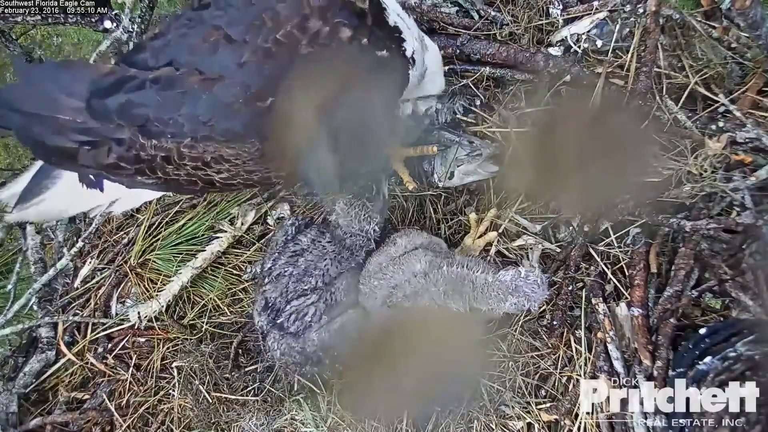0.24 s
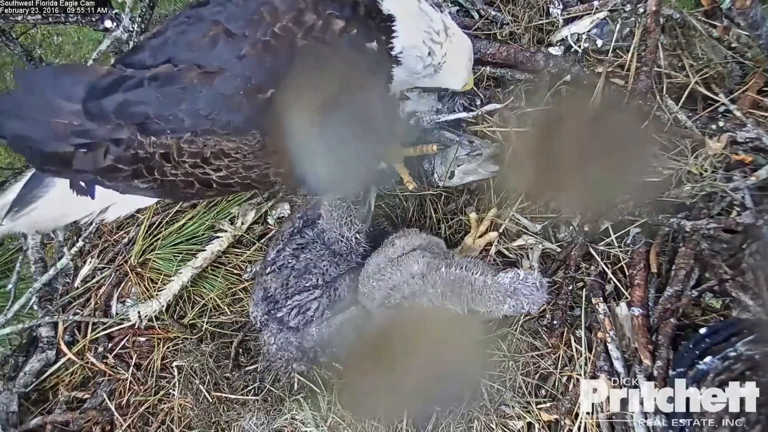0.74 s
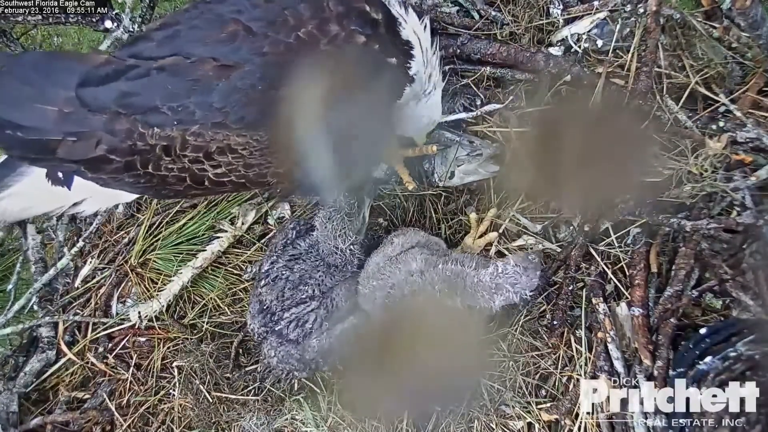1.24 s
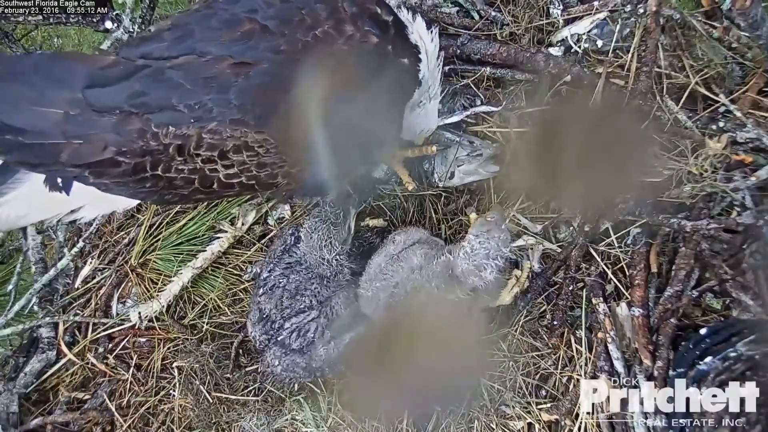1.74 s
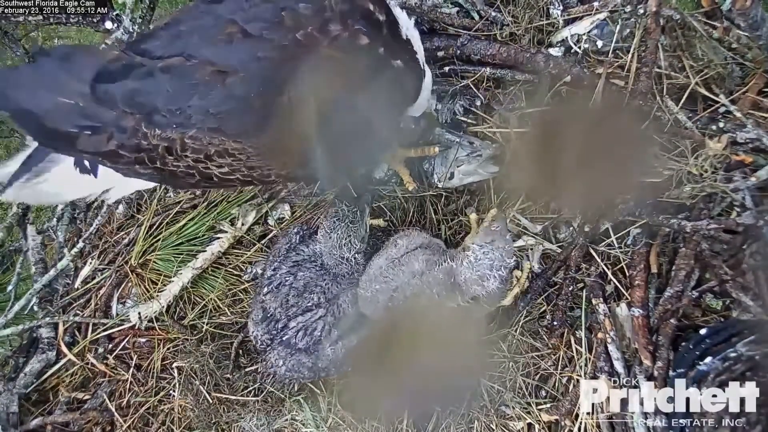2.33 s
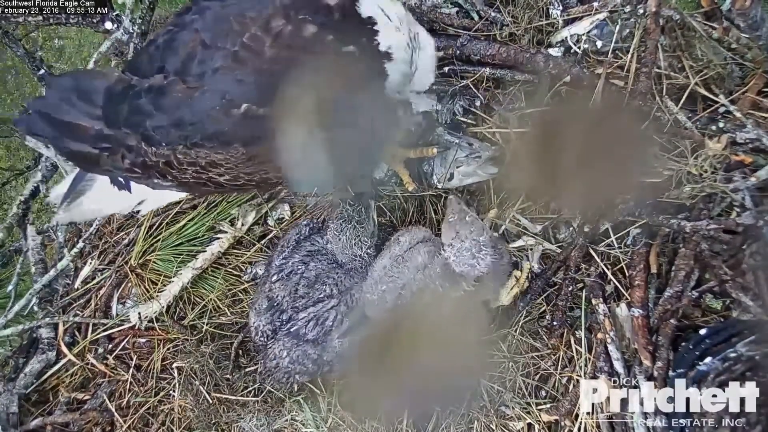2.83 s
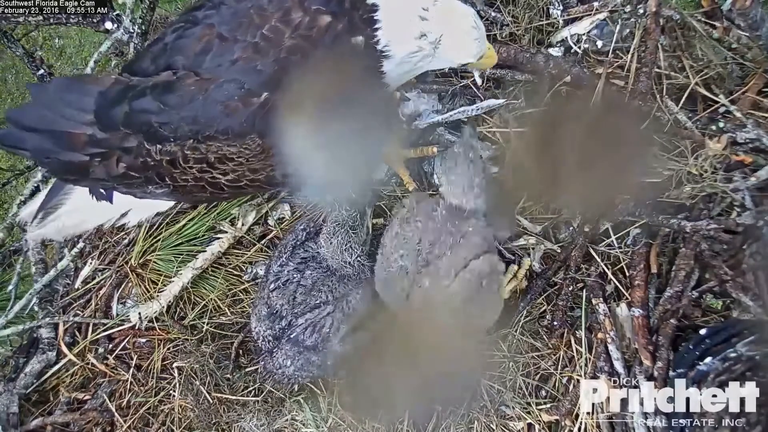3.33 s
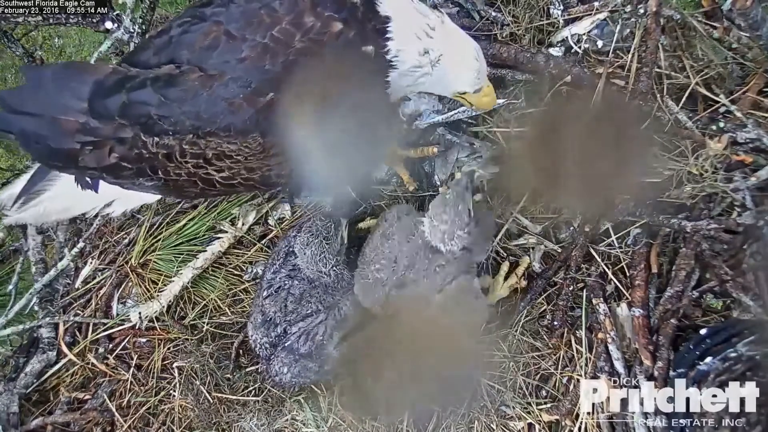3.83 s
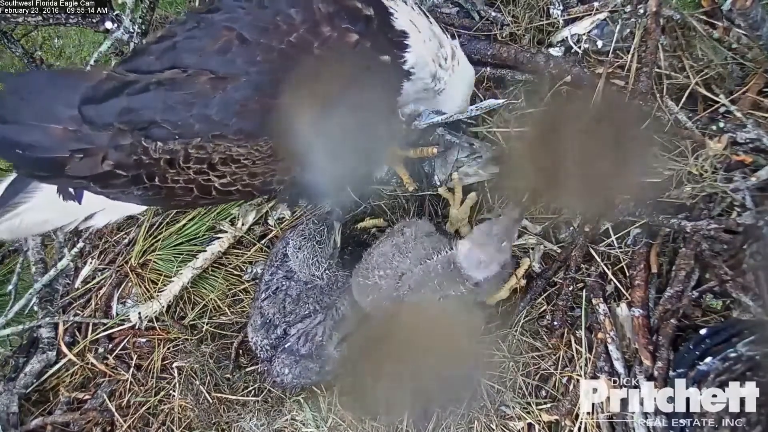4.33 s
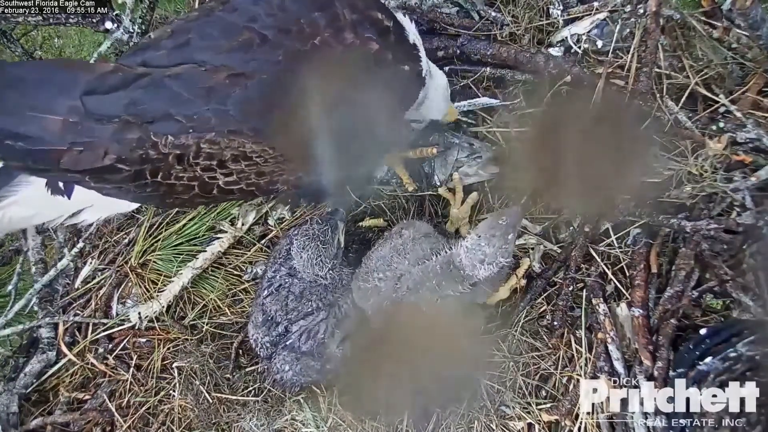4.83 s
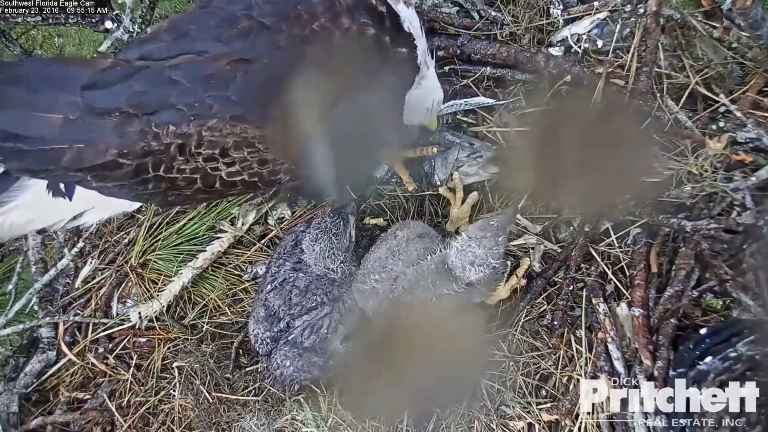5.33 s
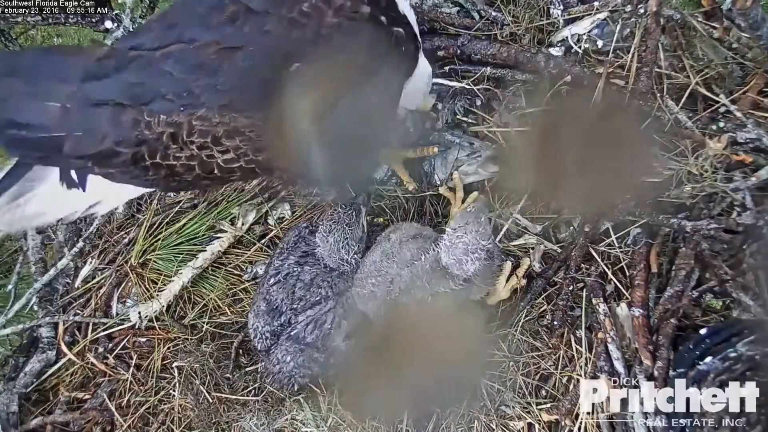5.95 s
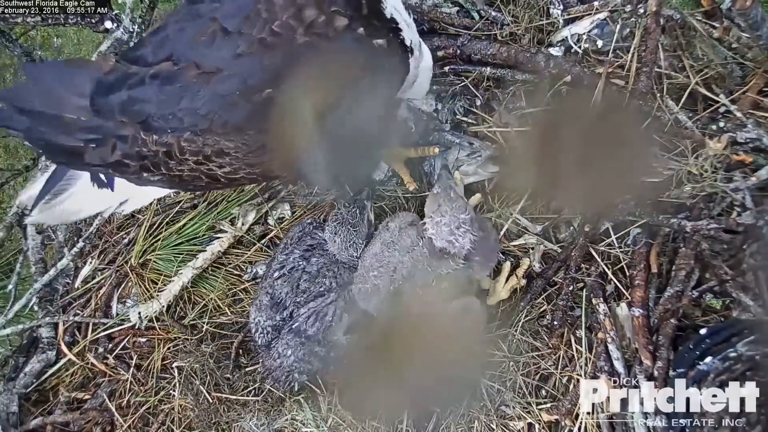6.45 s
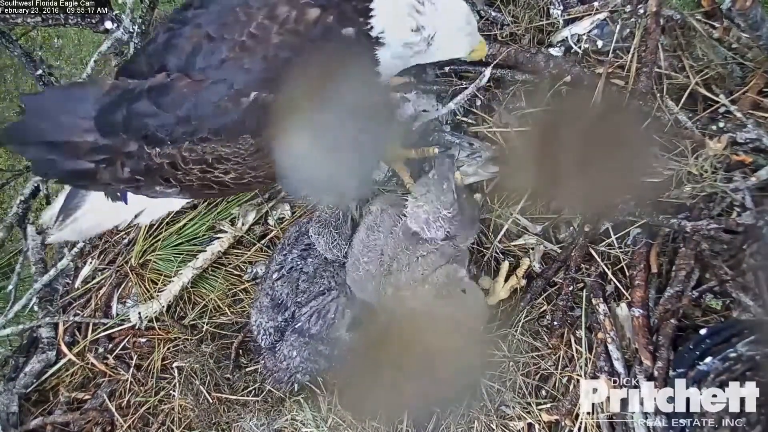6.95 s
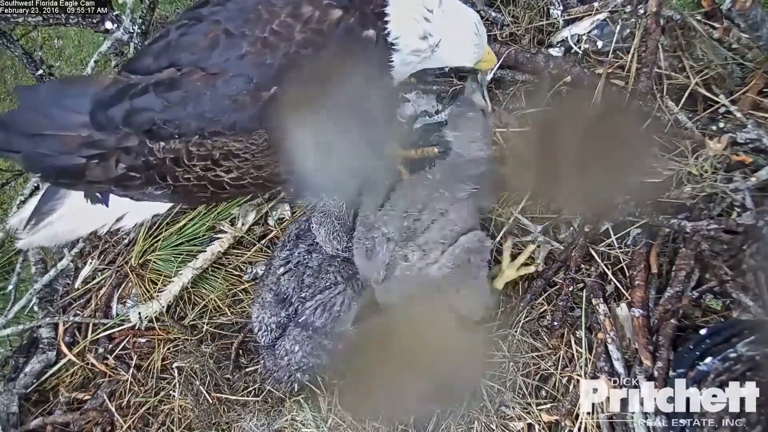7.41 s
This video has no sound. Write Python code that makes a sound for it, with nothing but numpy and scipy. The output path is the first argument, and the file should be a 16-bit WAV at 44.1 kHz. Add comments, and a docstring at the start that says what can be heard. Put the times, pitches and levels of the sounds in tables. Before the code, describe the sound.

Outdoors at a stick nest, eagle chicks beg beside a feeding adult, heard close by a wind-exposed microphone. Light rain makes a soft, patchy mid-high wash with fine drops; a faint wavering low drone and weak moans lie far behind. Wind rumbles throughout in lumpy gusts, with hard thumps near 2.8, 3.0, 4.0, 4.7 and 6.1 seconds. Tiny chirps and slurred pips open the scene. From 0.9 to 1.7 a thin, trembling whine climbs, then drops sharply. An airy arched peep follows at 2.0, another whine from 2.6 to 3.4, and a second peep at 3.7. Soft whimpering starts at 4.0, with quick pips to 5.0, then a wavering wail from 5.1 ending in a sudden fall at 5.75. A loud, raspy, breathy two-part cry bursts out at 6.05-6.5. Another wail runs from 6.75 to 7.4, with last twitters near 7.6.

```python
"""Eagle chicks begging at an open nest

Thin rising whines, arched peeps, quick pips and one loud cry; some are heard again as the sound repeats 1.682 s later.
Each voice is a trembling sine with a weaker octave and a fringe of narrow noise; open-beaked calls add airy noise.
Wind gusts are shaped low noise and single pressure pulses; light rain is patchy noise with a patter of drops.
A faint far drone, weaker moans and thin high sizzles are narrow bands of noise."""
import sys
import numpy as np
from scipy import signal
from scipy.fft import rfft, irfft, next_fast_len
from scipy.io import wavfile
from scipy.ndimage import uniform_filter1d, map_coordinates

SR = 44100
rng = np.random.default_rng(int(sys.argv[2]) if len(sys.argv) > 2 else 0)


def wav_record(signal):
    """Record a signal, one row per channel, as 16-bit PCM in the file named by sys.argv[1]."""
    frames = np.transpose(np.atleast_2d(signal))
    bounded = np.clip(frames, -1, 1)
    # unit amplitude maps onto the largest positive 16-bit level
    quanta = np.round(bounded * 32767).astype(np.int16)
    wavfile.write(sys.argv[1], SR, quanta)


N = 338688
TIME = np.arange(N) / SR
AGAIN_S = 1.682  # time until a sound is heard again

# the open-beaked peep, as a curve before its gain: t/s, f/Hz, level/dB
PEEP = [(2.017, 2990, -31.5), (2.03, 3145, -29.5), (2.058, 3266, -27), (2.082, 3570, -32.5),
        (2.113, 3216, -27), (2.135, 3260, -25.5), (2.19, 3196, -41)]
# the loud cry, as a curve before its gain: t/s, f/Hz, level/dB
CRY = [(6.055, 2740, -34.5), (6.093, 3360, -20.5), (6.097, 2960, -21.5), (6.145, 3014, -24),
       (6.178, 2910, -23.5), (6.215, 2900, -23.5), (6.243, 2770, -26), (6.253, 2800, -24),
       (6.257, 2985, -23.5), (6.295, 3120, -23), (6.32, 3460, -31), (6.375, 3595, -23),
       (6.405, 3442, -20.5), (6.455, 3416, -25.5), (6.472, 3290, -27.5), (6.48, 2740, -33),
       (6.497, 2380, -32), (6.508, 2320, -32)]
# wind gusts, before the overall trims: t of the peak/s, length/s, rumble level/dB, flutter level/dB
GUSTS = [(0.568, 0.12, -22, -22.5), (0.756, .16, -21.5, -27), (0.93, 0.16, -24.5, -26.5),
         (1.63, 0.21, -26, -25.5), (2.05, 0.15, -21.5, -34), (2.358, 0.24, -22, -31),
         (2.766, 0.29, -22.5, -30), (3.055, 0.16, -18, -29.5), (3.293, 0.13, -28.5, -27),
         (3.555, 0.27, -17, -25), (4.024, 0.29, -20.5, -25.5), (4.41, 0.24, -21, -48),
         (5.049, 0.095, -18, -40), (5.329, 0.078, -19.5, -31.5), (5.528, 0.16, -19.5, -24),
         (5.747, 0.091, -20.5, -26.5), (6.047, 0.13, -21, -34.5), (6.519, 0.33, -20.5, -27),
         (6.955, 0.23, -24, -28.5), (7.295, 0.099, -26.5, -32), (7.58, 0.16, -24, -27.5)]


def amp(db):
    """Turns decibels into a gain."""
    return 10 ** (np.asarray(db) / 20)


def evened(x):
    """Scales a sound to an average (rms) strength of 1."""
    return x / np.sqrt(np.mean(x ** 2) + 1e-20)


def read(points, hz):
    """Looks up a table's value at hz, on a log-frequency axis."""
    f, value = np.transpose(points)
    return np.interp(np.log(hz + 1), np.log(f + 1), value)


def add(mix, s, sound):
    """Mixes a sound in at s seconds."""
    part = mix[max(round(s * SR), 0):][:len(sound)]
    part += sound[:len(part)]


def coloured(x, points):
    """Filters a sound by a table of f/Hz, level/dB."""
    gain = amp(read(points, np.fft.rfftfreq(N, 1 / SR)))
    return irfft(rfft(x) * gain, N)


def wander(n, hz):
    """Smooth random motion of rms 1 that moves up to about hz times a second."""
    size = next_fast_len(n + SR // 4)
    f = np.fft.rfftfreq(size, 1 / SR)
    spectrum = rfft(rng.standard_normal(size)) * np.exp(-(f / hz) ** 2)
    return evened(irfft(spectrum, size))[:n]


def fuzzy(hz, width_hz):
    """A narrow band of noise of rms 1 round a moving pitch."""
    phase = 2 * np.pi * np.cumsum(hz) / SR
    return wander(len(hz), width_hz) * np.cos(phase) + wander(len(hz), width_hz) * np.sin(phase)


def swells(rows, width_hz):
    """Narrow bands of noise that each fade in and out."""
    out = np.zeros(N)
    for s, length, hz, db in rows:
        swell = np.cos(np.pi / 2 * np.clip((TIME - s) / length, -1, 1)) ** 2
        heard = abs(TIME - s) < length
        out[heard] += amp(db) * swell[heard] * fuzzy(np.full(heard.sum(), hz), width_hz)
    return out


def drone(width_hz=13.6, waver=0.0253, waver_hz=4):
    """A far, fuzzy tone: a narrow noise band that drifts and wavers in pitch."""
    # slow drift of the drone: t/s, f/Hz, level/dB
    drift = [(0, 381, -39), (.55, 355.5, -46), (1.2, 364, -38), (1.8, 401.6, -44.5), (3.1, 400, -46),
             (3.85, 410, -40.5), (4.4, 397, -44), (4.8, 374, -53), (6.3, 370.3, -49.5),
             (6.95, 393.5, -43.5), (7.35, 380.4, -56), (7.68, 370, -46)]
    s, hz, db = np.transpose(drift)
    pitch = np.interp(TIME, s, hz) * (1 + waver * wander(N, waver_hz))
    return amp(np.interp(TIME, s, db)) * fuzzy(pitch, width_hz)


def moans(width_hz=15.4):
    """Weaker moans near the drone: narrow noise bands that swell now and then."""
    # swells of moaning: t of the middle/s, fade time each way/s, centre f/Hz, level/dB
    moan_rows = [(.35, 0.94, 487, -45.5), (1.1, 0.45, 493, -47.5), (1.56, 0.24, 537, -43.5),
                 (2.05, 0.49, 535.5, -47.5), (2.75, 0.5, 361.5, -40), (3.27, 0.25, 542, -49),
                 (3.98, 0.29, 467.4, -43), (5.6, 0.3, 496, -44)]
    return swells(moan_rows, width_hz)


def rain(rain_db=-31, patch_db=1.0, drops_per_s=350, drops_db=-13):
    """Rain in the foliage: a slightly patchy wash of far drops, with a patter of nearer ones."""
    # tone of rain in the leaves: f/Hz, relative level/dB
    leaf_tone = [(300, -4), (600, -6.5), (900, -9.5), (1100, -8.5), (1450, -3), (1850, -7.5), (2150, -4),
                 (2500, -3.5), (2800, 0), (3600, -8.5), (4600, -18), (5600, -29), (6800, -40),
                 (7200, -61.5), (9000, -68)]
    z = signal.stft(rng.standard_normal(N), nperseg=512)[2]
    patches = uniform_filter1d(rng.standard_normal(z.shape), size=6, axis=0)  # smooth across pitch
    patches = evened(uniform_filter1d(patches, size=14, axis=1))  # then across time
    wash = evened(signal.istft(z * amp(patch_db * patches), nperseg=512)[1][:N])
    drops = evened(rng.standard_normal(N) * (rng.random(N) < drops_per_s / SR))
    return amp(rain_db) * evened(coloured(wash + amp(drops_db) * drops, leaf_tone))


def sizzle(width_hz=420, fizz_db=-70, flicker_db=3, flicker_hz=18):
    """Noise bands make soft swells of thin, high hiss, with a very faint flickering fizz."""
    # tone of the faint fizz: f/Hz, relative level/dB
    fizz_tone = [(4000, -25), (6000, 17), (6800, -5), (7400, -2), (9000, 0.5), (11000, 13), (12500, 3),
                 (14800, -1)]
    # swells of thin hiss: t of the middle/s, fade time each way/s, centre f/Hz, level/dB
    sizzle_rows = [(0.693, 0.093, 6200, -59), (1.693, 0.079, 6240, -57), (1.888, 0.13, 6460, -55),
                   (3.25, 0.18, 6380, -59.5), (3.40, 0.15, 6280, -57), (3.568, 0.096, 6300, -53.5),
                   (4.601, 0.098, 6600, -57), (4.928, 0.12, 6250, -56.5), (5.126, 0.084, 6160, -55),
                   (7.50, 0.031, 6200, -52)]
    flicker = amp(flicker_db * wander(N, flicker_hz))
    fizz = evened(coloured(rng.standard_normal(N), fizz_tone) * flicker)
    return amp(fizz_db) * fizz + swells(sizzle_rows, width_hz)


def gusting(breeze_db, peaks_db, rise=0.37):
    """Strength of the wind: each gust builds, dies away more slowly, and adds its power to the breeze."""
    power = amp(breeze_db) ** 2
    for (s, length, _, _), db in zip(GUSTS, peaks_db):
        width = length * np.where(TIME < s, rise, 1 - rise)  # rise is the share spent building up
        power = power + amp(db) ** 2 * np.exp(-((TIME - s) / width) ** 2)
    return np.sqrt(power)


def wind(breeze_db=-27, wind_db=0.5, lump_db=2.0, lump_hz=25):
    """Lumpy turbulence follows the gusts; single eddies push and pull on the diaphragm."""
    # tone of the rumble at the microphone: f/Hz, relative level/dB
    rumble_tone = [(8, -10.5), (18, 5.5), (28, 2.5), (50, -0.5), (80, -8.5), (120, -18.5), (170, -21.5),
                   (260, -24), (400, -39), (600, -48), (1200, -97.5)]
    # single eddies that thump the microphone: t/s, f/Hz, peak level/dB, push +1 or pull -1
    buffets = [(.778, 59.1, -13, -1), (2.849, 89.5, -11, 1), (3.040, 70.2, -5, 1), (3.982, 50.3, -14, -1),
               (4.007, 194, -10, -1), (4.014, 242, -14.5, 1), (4.025, 240, -16.5, 1), (4.691, 26.6, -9, -1),
               (5.520, 198.4, -21, 1), (6.101, 35, -10.5, -1)]
    lumps = amp(lump_db * wander(N, lump_hz))
    eddies = evened(coloured(rng.standard_normal(N), rumble_tone) * lumps)
    out = eddies * amp(wind_db) * gusting(breeze_db, [rumble_db for _, _, rumble_db, _ in GUSTS])
    for s, hz, db, way in buffets:
        u = (np.pi * hz * (TIME - s)) ** 2
        out += np.sign(way) * amp(db) * (1 - 2 * u) * np.exp(-u)  # a pulse with an opposite swing each side
    return out


def flutter(breeze_db=-31.5, flutter_db=-0.64):
    """Faster air sheds smaller eddies, which sound higher."""
    # tone of the small, fast eddies: f/Hz, relative level/dB
    flutter_tone = [(35, -8), (65, 4.5), (115, 2.5), (180, -5.5), (260, -7.5), (400, -16), (600, -26.5),
                    (1200, -87)]
    strength = gusting(breeze_db, [db for _, _, _, db in GUSTS])
    return amp(flutter_db) * strength * evened(coloured(rng.standard_normal(N), flutter_tone))


def air(air_db=-24, smooth_s=0.057):
    """Air rushes through the open beak in the peeps and the cry: high noise with softened swells."""
    # tone of the breathy rush: f/Hz, relative level/dB
    breath_tone = [(3500, -40), (4500, 4), (5400, 0.5), (6100, 4.5), (6550, 11), (6950, -8.5),
                   (7400, -32.5), (9000, -63)]
    effort = np.zeros(N)
    for rows, delay in ((PEEP, 0), (PEEP, AGAIN_S), (CRY, 0)):
        s, hz, db = np.transpose(rows)
        effort += np.interp(TIME, s + delay, amp(db), 0, 0)
    effort = uniform_filter1d(effort, int(smooth_s * SR))
    return amp(air_db) * effort * evened(coloured(rng.standard_normal(N), breath_tone))


def syrinx(hz, level, overtone_db, jitter=0.0019, rasp=.08, jitter_hz=350, rasp_hz=650,
           octave_shimmer_db=2.5, octave_shimmer_hz=90):
    """A nearly pure whistle trembles in pitch, with a raspy fringe; the beak colours its unsteady octave."""
    # beak colour on the octave: f/Hz, gain/dB
    beak = [(4700, -10), (5050, 4), (5350, -2), (5700, -1.5), (6300, -1.5), (6600, -9), (7100, -12.5),
            (7500, -23.5), (8200, -40)]
    phase = 2 * np.pi * np.cumsum(hz * (1 + jitter * wander(len(hz), jitter_hz))) / SR
    push = level / level.max()  # the octave grows faster than the note as the bird pushes harder
    octave_db = overtone_db + read(beak, 2 * hz)
    octave_db = octave_db + octave_shimmer_db * wander(len(hz), octave_shimmer_hz)
    tone = np.sin(phase) + push * amp(octave_db) * np.sin(2 * phase)
    return level * (np.sqrt(2) * tone + rasp * fuzzy(hz, rasp_hz))


def catching(n, per_s, length_s=.006, depth_db=7):
    """A straining voice catches at random moments, its level dipping for a few milliseconds each time."""
    starts = rng.random(n) < per_s / SR
    dips = signal.fftconvolve(starts * 1., np.hanning(max(int(length_s * SR), 3)), "same")
    return amp(-depth_db * np.clip(dips, 0, 1))


def call(rows, gain_db, overtone_db, jitter, rasp, falter_db, falter_hz=45, fade_s=0.0036, catches_per_s=0):
    """A drawn-out call follows its curve; it may catch, and falters and gets hoarser as pitch strains up."""
    s, hz, db = np.transpose(rows)
    t = np.arange(s[0], s[-1], 1 / SR)
    pitch = np.interp(t, s, hz)
    strain = (pitch / hz.max()) ** 6
    falter = falter_db * strain * wander(len(t), falter_hz)
    level = amp(np.interp(t, s, db) + gain_db + falter)
    level *= signal.windows.tukey(len(t), 2 * fade_s * SR / len(t))
    level *= catching(len(t), catches_per_s)
    return s[0], syrinx(pitch, level, overtone_db, jitter, rasp * strain)


def short_notes(rows, shape, fade_s=0.0031):
    """Quick notes share one bend of pitch and level, stretched to each note's length."""
    out = np.zeros(N)
    bend, swell_db = np.transpose(shape)
    for s, length, hz, db, times_heard in rows:
        place = np.linspace(0, len(shape) - 1, int(length * SR))
        pitch = hz * map_coordinates(bend, [place], order=2, mode="nearest")
        level = amp(db + np.interp(place, np.arange(len(shape)), swell_db))
        level *= signal.windows.tukey(len(place), 2 * fade_s / length)
        for k in range(round(times_heard)):
            add(out, s + k * AGAIN_S, syrinx(pitch, level, overtone_db=-31.5, rasp=0.071))
    return out


def quick_calls():
    """The chicks' brief notes: seven kinds, each whistled with its own bend."""
    # notes of each kind: t/s, length/s, f/Hz, level/dB before the shape, times heard
    # shapes, evenly spaced over a note: pitch as a share of the note's f, level change/dB
    pips, arch = [(4.454, 0.073, 4470, -38.5, 2), (4.921, 0.026, 3880, -26, 2),
                  (6.215, 0.066, 4450, -44.5, 1)], [(.89, -6), (.975, -1.5), (1, 0), (.975, -1), (.88, -5)]
    slurs, slide = [(.1005, 0.011, 3620, -30.5, 1), (.242, 0.0175, 3720, -28, 1),
                    (.336, 0.013, 3620, -33.5, 1), (4.543, .012, 3250, -31.5, 2),
                    (4.623, 0.012, 3700, -34, 2), (4.709, 0.0075, 3560, -28, 2),
                    (6.357, 0.012, 2950, -32, 1), (7.657, 0.0095, 3480, -30, 1)], [(1.18, -7), (1.1, -2), (1.02, 0), (.93, 1), (.78, 2)]
    chips, dip = [(.865, .028, 3590, -31.5, 1)], [(1.27, -7), (1.08, -1), (.99, 5), (1.07, 0), (1.27, -9)]
    twitters, arch_and_flick = [(.012, 0.055, 3950, -32.5, 1), (1.369, 0.064, 3950, -27.5, 2),
                                (7.567, 0.0444, 3930, -28.5, 1)], [(.86, -5), (.945, -1), (.985, -1), (1, 0), (.995, -1),
                                                  (.965, 1), (.915, 3), (.95, 2), (1.12, -5)]
    flat_notes, level_note = [(.346, .013, 3040, -31, 1), (1.19, 0.0098, 3560, -32, 1),
                              (3.851, 0.066, 2410, -39, 2), (4.648, 0.024, 3810, -37, 2),
                              (5.021, .012, 4400, -44, 2), (5.048, 0.013, 3270, -34.5, 2)], [(1.015, 0), (1, 0), (.98, -2)]
    hoops, hoop = [(5.3125, .042, 4150, -33.5, 2)], [(.65, -2), (.81, 2), (.9, 1), (.965, -3), (.995, -1), (1, 0), (.98, -2),
                                  (.93, -1), (.82, 7), (.6, 4)]
    stumbles, step = [(.12, .02, 3500, -36, 1), (.266, .023, 3620, -30.5, 1), (.7165, .007, 3060, -27, 1),
                      (1.16, .028, 3730, -30, 1), (2.398, .007, 3080, -23, 1), (4.725, .03, 3560, -28, 2),
                      (5.028, .018, 3570, -33, 2)], [(1.13, -5), (.99, 1), (1.01, 1), (.95, -3), (.88, -4), (.81, -5)]
    kinds = ((pips, arch), (slurs, slide), (chips, dip), (twitters, arch_and_flick),
             (flat_notes, level_note), (hoops, hoop), (stumbles, step))
    return sum(short_notes(rows, shape) for rows, shape in kinds)


def chicks(cry_catches_per_s=35, whistle_catches_per_s=14):
    """Four begging calls, each heard again as the sound repeats 1.682 s later, one loud cry and short notes."""
    # drawn-out calls, as curves before their gains: t/s, f/Hz, level/dB
    whine = [(.948, 3180, -29.5), (.972, 3320, -31.5), (1.01, 3360, -31), (1.04, 3450, -37),
             (1.07, 3534, -37.5), (1.125, 3620, -36), (1.15, 3740, -39.5), (1.24, 3800, -44),
             (1.29, 4010, -48), (1.32, 4080, -43), (1.355, 3950, -37), (1.385, 4060, -49),
             (1.45, 4200, -55), (1.48, 3960, -39), (1.503, 4050, -35), (1.55, 4090, -39), (1.58, 3870, -39),
             (1.605, 4080, -43), (1.63, 3830, -31.5), (1.648, 3810, -35), (1.66, 3860, -33),
             (1.676, 3470, -26), (1.683, 3180, -27.5), (1.69, 2950, -39)]
    whimper = [(3.99, 2880, -41), (4.045, 3175, -37), (4.1, 3087, -37), (4.14, 3130, -34.5),
               (4.185, 3387, -35), (4.22, 3220, -32), (4.29, 3610, -43)]
    wail = [(5.064, 3690, -36), (5.071, 3750, -38), (5.09, 3780, -42), (5.13, 3580, -44),
            (5.143, 3570, -35.5), (5.195, 3550, -38), (5.235, 3700, -38), (5.257, 3730, -44),
            (5.272, 3740, -38.5), (5.32, 3556, -36.5), (5.345, 3660, -29), (5.365, 3750, -26.5),
            (5.423, 3580, -33), (5.457, 3750, -31), (5.487, 3680, -31.5), (5.61, 3995, -35),
            (5.65, 4070, -33.5), (5.70, 4090, -38.5), (5.722, 3980, -31), (5.733, 3500, -23.5),
            (5.744, 3070, -26.5), (5.747, 2600, -21), (5.754, 2500, -19.5), (5.761, 2470, -30)]
    out = np.zeros(N)
    for delay in (0, AGAIN_S):
        begging = (
            call(whine, gain_db=-1.0, overtone_db=-23, jitter=0.0063, rasp=0.28, falter_db=1.0,
                 catches_per_s=whistle_catches_per_s),
            call(PEEP, gain_db=2.5, overtone_db=-24, jitter=0.011, rasp=0.21, falter_db=0.5),
            call(whimper, gain_db=2.5, overtone_db=-47, jitter=0.0036, rasp=.1, falter_db=3.5),
            call(wail, gain_db=-0.6, overtone_db=-24.0, jitter=0.0048, rasp=0.12, falter_db=0.0,
                 catches_per_s=whistle_catches_per_s))
        for s, sound in begging:
            add(out, s + delay, sound)
    s, cry = call(CRY, gain_db=1.7, overtone_db=-8.5, jitter=0.004, rasp=0.24, falter_db=0.5,
                  catches_per_s=cry_catches_per_s)
    add(out, s, cry)
    return out + quick_calls()


def branches(x, t60=0.23):
    """Sticks and limbs round the nest scatter a short echo, which falls 60 dB in t60 seconds."""
    t = np.arange(SR // 4) / SR
    echoes = rng.standard_normal(len(t)) * (rng.random(len(t)) < 2000 / SR) * amp(-60 * t / t60)
    return signal.fftconvolve(x, echoes / np.linalg.norm(echoes))[:N]


def scene(limb_echo_s=0.011, limb_echo_db=-23):
    """The nest and its echoes, the far weather and the wind on the microphone."""
    near = chicks() + air()
    echoes = amp(-13.0) * branches(near)
    add(echoes, limb_echo_s, amp(limb_echo_db) * near)  # one near limb throws back a distinct reflection
    far = rain() + sizzle() + drone() + moans()
    return (near + echoes + far + wind() + flutter())[None]


def record(dry, edge_hz=14900):
    """The nest camera's band limit: a steep low-pass filter takes off the highest treble."""
    low_pass = signal.firwin(511, edge_hz, window=("kaiser", 8), fs=SR)
    return signal.oaconvolve(dry, low_pass[None], "same")


dry = scene()
out = record(dry)
wav_record(out)
```